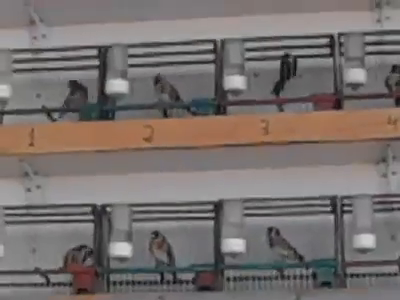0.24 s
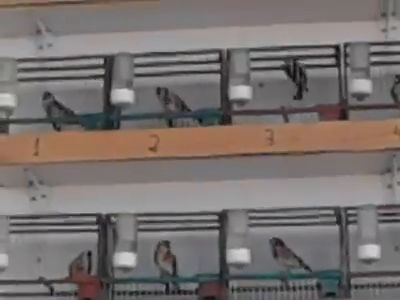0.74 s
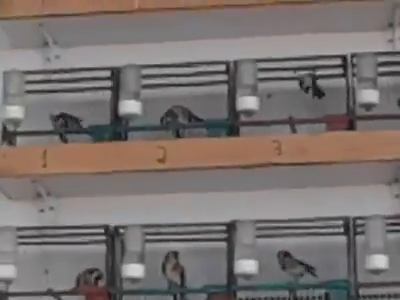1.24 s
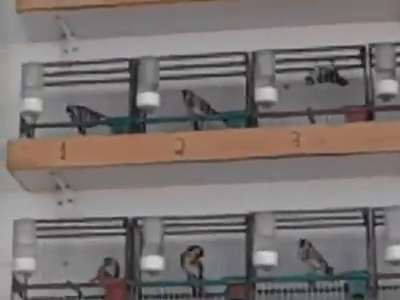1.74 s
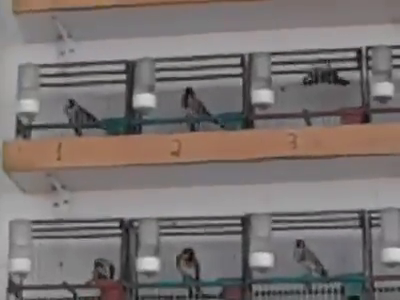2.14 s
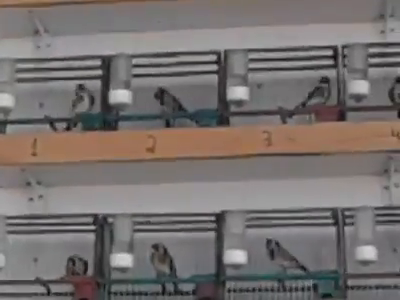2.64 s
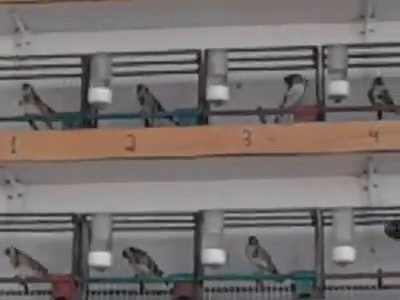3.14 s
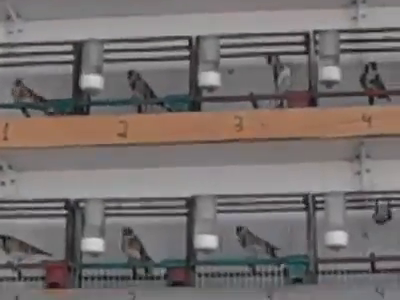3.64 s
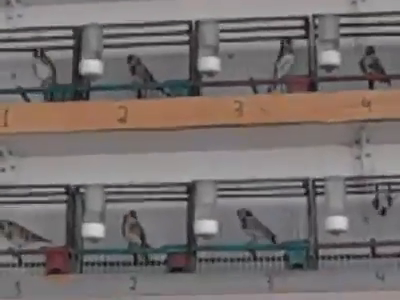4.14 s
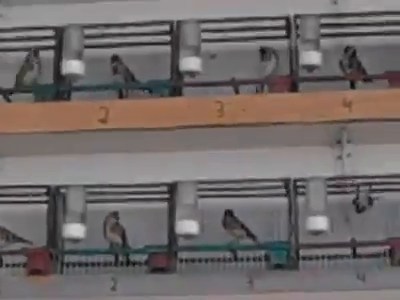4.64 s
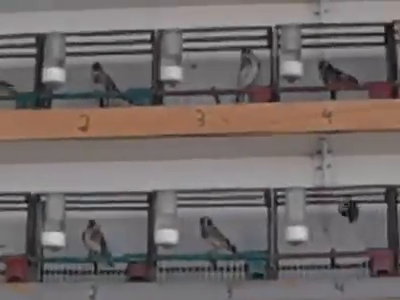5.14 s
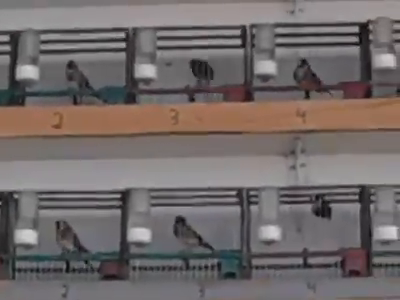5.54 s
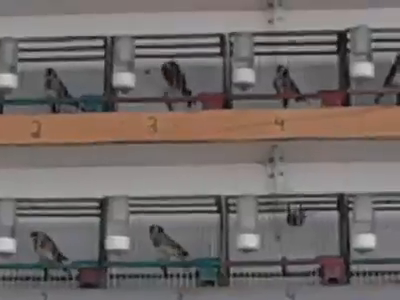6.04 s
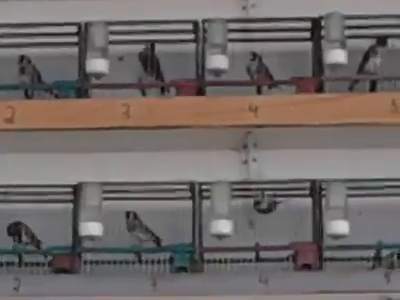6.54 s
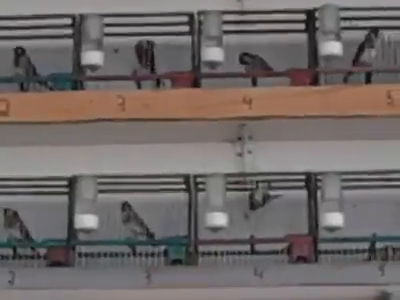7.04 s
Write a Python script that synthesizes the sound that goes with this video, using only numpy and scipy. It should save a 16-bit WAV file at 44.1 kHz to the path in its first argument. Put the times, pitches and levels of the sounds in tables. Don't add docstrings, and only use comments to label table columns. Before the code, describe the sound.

Several small caged finches twitter in bright, rapid chirps and short gliding whistles in a hard-walled room, with brief pauses and faint knocks.

```python
import sys
import numpy as np
from scipy import signal
from scipy.io import wavfile
from scipy.ndimage import uniform_filter1d, minimum_filter1d

SR = 44100
rng = np.random.default_rng(int(sys.argv[2]) if len(sys.argv) > 2 else 0)


def materialize(psi):
    bounded = np.clip(np.atleast_2d(psi).T, -1, 1)
    quanta = np.round(bounded * 32767).astype(np.int16)
    wavfile.write(sys.argv[1], SR, quanta)


def rack_gain(trim_db):
    fader = np.asarray(trim_db, float)
    return 10 ** (fader / 20)


N = 321930


def evened(x):
    return x / np.sqrt(np.mean(x ** 2) + 1e-20)


def read(points, hz):
    f, value = np.transpose(points)
    return np.interp(np.log(hz + 1), np.log(f + 1), value)


def add(mix, s, sound):
    part = mix[max(round(s * SR), 0):][:len(sound)]
    part += sound[:len(part)]


def tent(t, top_s, rise, fall):
    return np.minimum(rise * (t - top_s), fall * (top_s - t))


def resonate(x, hz, width):
    turn = np.exp(2j * np.pi * np.cumsum(hz * np.ones(len(x))) / SR)
    r = np.exp(-np.pi * width / SR)
    smooth = signal.lfilter([(1 - r) ** 2], [1, -2 * r, r * r], x / turn + 1e-18)
    return 2 * (turn * smooth).real


def noise(spectrum, patchy_db):
    hz = np.fft.rfftfreq(1024, 1 / SR)
    a, b, patches = rng.standard_normal((N // 256 + 5, 513, 3)).T
    patches = uniform_filter1d(uniform_filter1d(patches, 12, 0), 12, 1)
    level_db = read(spectrum, hz)[:, None] + patchy_db * evened(patches)
    z = (a + 1j * b) * rack_gain(level_db)
    return evened(signal.istft(z, nperseg=1024, noverlap=768)[1][:N])


# pitch in Hz, level in dB per Hz.
AIR_SPECTRUM = [(25, -18.5), (110, -11), (1320, -15), (3400, -10.5), (6500, -23.5), (8000, -66)]


def still_air():
    return rack_gain(-71.5) * noise(AIR_SPECTRUM, patchy_db=1)


# pitch in Hz, level in dB per Hz.
FLOCK_SPECTRUM = [(1200, -32), (2000, -16), (3500, 14), (6000, 1.5), (7200, -12), (8200, -52),
                  (16000, -85)]
# time in seconds, level in dB.
FLOCK_LEVEL = [(0, -62), (.72, -83.5), (1.1, -56), (1.5, -65), (2.4, -90), (3.5, -70), (3.9, -74),
               (4.6, -65.5), (5.1, -59), (7.3, -55.5)]


def far_flock():
    level_db = np.interp(np.arange(N) / SR, *np.transpose(FLOCK_LEVEL))
    return rack_gain(level_db) * noise(FLOCK_SPECTRUM, patchy_db=4.5)


# peak time in seconds, peak level in dB.
MOTOR_LOADS = [(3.4, -70.5), (4.198, -75), (4.997, -71), (6.248, -82), (6.9, -69.5), (7.3, -83)]


def motor():
    t = np.arange(N) / SR
    idle_db, load_db_per_s, unload_db_per_s = -97, 49, 59.5
    level = rack_gain(idle_db)
    for s, db in MOTOR_LOADS:
        level = level + rack_gain(db + tent(t, s, load_db_per_s, unload_db_per_s))
    return level * evened(resonate(rng.standard_normal(N), 114.7, 31))


# start in seconds, seconds held open, upper band in dB, lower band in dB.
VALVE_OPENINGS = [
    (0.552, 0.81, -47, -66),
    (3.9, 0.4, -77, -70.5),
]


def valve():
    t = np.arange(N) / SR
    open_db_per_s, close_db_per_s = 155, 20
    low_rise_db_per_s, low_lag_s, leak_db = 21, .15, -83.5
    upper, lower = 0, rack_gain(leak_db)
    for s, held, upper_db, lower_db in VALVE_OPENINGS:
        opening = tent(t, s, open_db_per_s, 0)
        closing = tent(t, s + held, 0, close_db_per_s)
        upper = upper + rack_gain(upper_db + np.minimum(opening, closing))
        lower = lower + rack_gain(lower_db + tent(t, s + held + low_lag_s, low_rise_db_per_s, close_db_per_s))
    jet_hz, sag_hz, sag_s = 2503, 137.7, 0.68
    closed_s = sum(VALVE_OPENINGS[0][:2])
    upper_hz = jet_hz - sag_hz * np.clip((t - closed_s) / sag_s + 1, 0, 1)
    upper_hz += 60 * np.exp(-((t - 1.02) / .15) ** 2)
    jet = rng.standard_normal(N)
    hollow = resonate(jet, upper_hz, 115) + 0.4 * resonate(jet, 0.94 * upper_hz, 220)
    high_hiss = upper * evened(resonate(hollow, 2300, 1100))
    return high_hiss + lower * evened(resonate(jet, 1744, 310))


# start in seconds, length in seconds, first and last pitch in Hz, level in dB.
HINGE_WHINES = [
    (0, 0.038, 785, 800, -76.5),
    (0.767, 0.17, 468, 467, -79.5),
    (2.388, .32, 818, 812.5, -68),
    (5.148, 0.16, 815, 819, -73),
    (5.777, 0.083, 1334, 1243, -69.5),
    (6.484, 0.19, 329.8, 329, -74.5),
]


def hinge():
    out = np.zeros(N)
    for s, length, first_hz, last_hz, db in HINGE_WHINES:
        hz = np.linspace(first_hz, last_hz, round(length * SR))
        tone = np.sin(2 * np.pi * np.cumsum(hz) / SR)
        tone += 0.68 * evened(resonate(rng.standard_normal(len(hz)), hz, 36))
        add(out, s, rack_gain(db) * tone * signal.windows.tukey(len(hz), .3))
    return out


# start in seconds, peak in dB, highest pitch in Hz.
PERCH_KNOCKS = [
    (0.344, -62, 830),
    (6.897, -66, 200),
]


def perch():
    out = np.zeros(N)
    t = np.arange(4000) / SR
    for s, db, top_hz in PERCH_KNOCKS:
        band = signal.butter(2, [70, top_hz], "band", fs=SR)
        burst = evened(signal.lfilter(*band, rng.standard_normal(4000)))
        add(out, s, rack_gain(db - 60 * t / 0.096) * burst * np.minimum(t / .003, 1))
    return out


# time in seconds, slips per second in Hz.
LEG_SLIPS = [(2.96, 262.8), (3.16, 257.2), (3.33, 251), (3.45, 258.2), (3.62, 255.3), (3.72, 272)]
# pitch in Hz, width in Hz.
CHAIR_RINGS = [
    (250, 114),
    (520, 306),
    (1060, 390),
]
# time in seconds, level in dB.
RING_CATCHES = [
    (3.2, -58),
    (3.065, -56),
    (3.175, -57),
]
RING_TIRES = [6.5, 13, 13]


def chair():
    times, rates = np.transpose(LEG_SLIPS)
    t = np.arange(times[0], times[-1], 1 / SR)
    slip_hz = np.interp(t, times, rates)
    wobble = 0.29 * uniform_filter1d(rng.standard_normal(len(t)), 400)
    turns = np.cumsum(slip_hz * (1 + wobble)) / SR
    slips = evened(sum(np.cos(2 * np.pi * k * turns) for k in range(1, 7)))
    drive = slips + np.linspace(1.2, 3.5, len(t)) * rng.standard_normal(len(t))
    catch_db_per_s, lift_s, lift_db_per_s = 160, 3.615, 199
    lift_db = np.minimum(lift_db_per_s * (lift_s - t), 0)
    rings = np.zeros(len(t))
    for (catch_s, db), tire, ring in zip(RING_CATCHES, RING_TIRES, CHAIR_RINGS):
        level_db = db + tent(t, catch_s, catch_db_per_s, tire) + lift_db
        rings += rack_gain(level_db) * evened(resonate(drive, *ring))
    return times[0], rings * signal.windows.tukey(len(t), .08)


OVERTONES = [-40, -42]


def note(length, first_hz, last_hz, db, breath):
    t = np.arange(0, 1.15 * length + 0.007, 1 / SR)
    now = breath[:len(t)]
    long_note = np.clip(length / .07 - 1, 0, 1)
    hz = first_hz + (last_hz - first_hz) * (1 - (1 - t / t[-1]) ** 1.2)
    far = np.clip((-46 - db) / 12, 0, 1) * (length > .07)
    drift = .009 * far * breath[np.arange(len(t)) // 8]
    turn = 2 * np.pi * np.cumsum(hz * (1 + drift)) / SR
    hoarse = 5.5 * np.clip(hz / 6890 - 1, 0, 1)
    turn += hoarse * breath[::-1][:len(t)]
    steep = abs(last_hz - first_hz) / length / 300000
    tone = np.sin(turn) * (1 + (0.01 + steep) * now)
    for k, overtone_db in enumerate(OVERTONES, 2):
        shrill_db = (k - 3.5) * 12 * min(length / 0.026, 1)
        if k * min(first_hz, last_hz) < SR / 3:
            tone += rack_gain(overtone_db + shrill_db) * np.sin(k * turn) * (.5 + 0.5 * now)
    rise_s = 0.0032 + 0.34 * min(length, .05) + 0.078 * max(length - .05, 0)
    fall_s = 0.0036 + 0.14 * length + max(length - .07, 0) / 2
    ends = np.clip(np.minimum(t / rise_s, (t[-1] - t) / fall_s), 0, 1)
    tone *= 1 + .85 * long_note * np.sin(2 * np.pi * 23 * t + 2 * breath[0])
    tone *= 1 + 0.5 * long_note * np.sin(2 * np.pi * 9 * t + np.cumsum(now) / 60 + 3 * breath[99])
    swell_db = 3 * np.clip(length / .03 - 1, 0, 1) * (t / t[-1] - .5)
    return rack_gain(db + swell_db) * tone * np.sin(np.pi / 2 * ends) ** 2


# start and length in seconds, lowest and highest pitch in Hz, level in dB.
CROWDS = [(-.05, 0.57, 3516, 5044, -41), (0.448, 0.16, 2536, 8790, -43), (0.808, 0.47, 3590, 5670, -68),
          (2.926, 0.3, 2577, 7500, -43), (3.725, 0.22, 2980, 7380, -56.5), (5.124, 0.24, 2530, 8460, -46),
          (5.754, 0.17, 2595, 6520, -47), (6.195, 0.14, 2770, 6640, -50), (6.806, 0.47, 2810, 7640, -43)]


def chatter(breath):
    out = np.zeros(N)
    for s, length, low_hz, high_hz, db in CROWDS:
        for when, pitch, glide, size in rng.random((60, 4)):
            hz = low_hz * (high_hz / low_hz) ** pitch
            last_hz = np.clip(hz * (.75 + .6 * glide), low_hz, high_hz)
            add(out, s + when * length, note(.007, hz, last_hz, db - 15 * size, breath))
    return out


# seconds from the phrase's beat, length in seconds, first and last pitch in Hz, level in dB.
TWITTER_NOTES = [(-.182, 0.009, 2412, 4275, -45.5), (-.058, 0.017, 5876, 7030, -47),
                 (-.029, 0.018, 3380, 3953, -34.5), (-.04, 0.013, 5150, 5720, -40),
                 (0, 0.0063, 2567, 2767, -36.5), (.021, 0.025, 4150, 4520, -33.5),
                 (.048, .028, 9270, 6100, -44), (.064, 0.0101, 4785, 4090, -36.5),
                 (.08, 0.022, 3680, 2622, -34)]
TUMBLE_NOTES = [(-.21, 0.0136, 2942, 3620, -30.5), (-.143, 0.007, 6350, 6600, -49),
                (-.108, 0.0107, 3290, 3587, -39.5), (-.069, 0.0086, 5960, 6646, -30.5),
                (-.068, 0.0031, 6620, 8600, -71), (-.048, .014, 5450, 4650, -34),
                (-.032, 0.012, 4656, 4155, -30.5), (0, 0.017, 3374, 2912, -36.5)]
THREE_PIPE_NOTES = [
    (0, 0.021, 4914, 5010, -32.5),
    (.04, .067, 3669, 3978, -27.5),
    (.15, .03, 6570, 6330, -29),
]
TWO_PIPE_NOTES = [
    (-.036, 0.019, 6990, 6850, -41.5),
    (0, .028, 6026, 5874, -25),
]
# beat in seconds, level in dB, pitch factor, swell in dB per s.
TWITTER_TIMES = [(.533, -1, 0.98, 1.5), (3.004, -1, 1, -12), (5.215, -2.5, 1, 20)]
TUMBLE_TIMES = [(1.507, -4, 1.006, 2.5), (3.901, -2, 1.001, 5.5), (6.473, -7, .995, -14)]
THREE_PIPE_TIMES = [(2.611, -4.5, 1.005, 20.5), (2.987, -3.2, 0.98, -12), (6.908, -0.5, 1.005, -41)]
TWO_PIPE_TIMES = [(.481, 3, .994, 203.5), (3.988, -7, 1.008, -200)]
STRETCHES = [(1, 1.02, 1), (1.01, .98, 1.01), (.98, 1.05, 1.01), (.9, 1.1)]
# start in seconds, length in seconds, first pitch in Hz, level in dB.
CHIP_NOTES = [(0, 0.008, 4760, -41.5), (0.129, .005, 4780, -40.5), (0.269, 0.009, 3350, -36.5),
              (0.504, .009, 4000, -38.5), (.462, .014, 2630, -49.5), (0.579, .005, 3475, -37),
              (.551, 0.012, 4250, -26.5), (0.583, 0.023, 3350, -44), (1.314, 0.0055, 2867, -33.5),
              (1.701, 0.006, 3464, -39.5), (1.754, 0.012, 6410, -39.5), (2.816, 0.008, 3893, -38),
              (2.843, .008, 3850, -45.5), (2.858, .01, 4190, -43.5), (2.853, 0.018, 4970, -43),
              (2.943, .006, 3230, -37.5), (2.949, .009, 4820, -47), (2.975, 0.0043, 2010, -52.5),
              (2.962, .012, 6820, -46.5), (3.653, 0.017, 3984, -50), (3.786, 0.012, 4020, -47),
              (3.933, 0.01, 4070, -32.5), (4.646, 0.0057, 2895, -41.5), (4.765, 0.0048, 3070, -46.5),
              (5.035, 0.0064, 3095, -41.5), (5.043, 0.013, 3484, -45), (5.105, 0.006, 4840, -38.5),
              (5.336, 0.008, 3410, -32), (5.359, 0.0045, 4860, -31.5), (5.142, .006, 2700, -50),
              (5.171, .009, 3240, -44), (5.2, .008, 4600, -40), (5.16, .014, 6430, -48),
              (5.312, .006, 6050, -44.5), (5.78, .004, 2720, -42), (5.899, .006, 3600, -40.5),
              (7.141, .01, 4860, -41), (1.153, .007, 4270, -48), (3.534, .008, 4270, -48),
              (6.117, .007, 4250, -46), (1.424, .005, 3250, -46), (1.176, .005, 2500, -46),
              (1.69, .003, 3450, -50), (5.537, 0.021, 6415, -37.5), (5.856, .01, 2720, -38),
              (5.971, .009, 2675, -48.5), (5.936, .014, 2610, -45.5), (6.227, 0.016, 5250, -44),
              (6.237, 0.0055, 3600, -36), (7.041, .008, 4200, -43), (7.12, .009, 4095, -29.5),
              (7.163, .013, 5080, -31), (2.592, 0.041, 3390, -52)]
# start in seconds, first and last pitch in Hz, level in dB.
SLUR_NOTES = [(0.092, 3250, 2950, -47.5), (0.092, 6850, 6450, -50), (0.48, 6630, 6300, -41),
              (0.493, 5410, 5240, -34), (.497, 1890, 2270, -48), (1.054, 3030, 3480, -56),
              (1.058, 2480, 2960, -45), (1.172, 2885, 3670, -41.5), (2.569, 6740, 5670, -61.5),
              (2.928, 9050, 6720, -51), (3.555, 2850, 3150, -53), (6.96, 3170, 3750, -37.5),
              (3.817, 3044, 3710, -43.5), (4.548, 2900, 2726, -51.5), (5.192, 2710, 3240, -37),
              (5.224, 2810, 3300, -40.5), (5.446, 2680, 3280, -38.5), (5.286, 6750, 6350, -44.5),
              (.113, 6330, 5950, -51.5), (5.811, 5540, 6250, -41), (5.831, 3170, 3650, -38.5),
              (5.92, 4200, 4800, -41.5), (6.983, 2464, 3050, -37.5), (7.033, 8080, 6980, -44),
              (7.04, 5050, 5690, -30), (7.175, 3110, 3730, -32), (7.197, 6140, 8000, -43.5),
              (.585, 8200, 7250, -62)]
# start in seconds, first and last pitch in Hz, level in dB.
WHIP_NOTES = [(.361, 2200, 3190, -43), (5.349, 3720, 4950, -34), (5.771, 3540, 4350, -36.5),
              (5.91, 3460, 4330, -37.5), (.47, 8830, 6010, -49), (1.869, 2920, 4170, -56),
              (2.172, 7670, 4450, -39.5), (2.461, 2850, 6250, -57), (2.566, 2596, 4310, -55),
              (3.228, 3690, 5750, -40), (3.95, 6640, 8460, -44.5), (5.093, 6320, 4600, -49.5),
              (5.099, 3040, 4330, -39.5), (5.851, 3380, 5030, -32), (6.226, 6400, 3300, -44),
              (6.758, 4240, 5640, -49.5), (6.83, 2390, 4570, -46), (6.914, 5660, 8850, -47.5)]
# start in seconds, length in seconds, pitch in Hz, level in dB.
PIP_NOTES = [(0.19, 0.025, 4050, -44.5), (0.3, .011, 4740, -25.5), (1.758, 0.0056, 5550, -30.5),
             (1.9, 0.0074, 4555, -33.5), (1.943, 0.12, 6305, -71.5), (2.177, .014, 4300, -38),
             (2.724, 0.025, 7680, -44), (4.754, .008, 5780, -58.5), (4.644, .006, 6190, -67.5),
             (3.128, 0.0039, 7520, -42.5), (3.241, 0.006, 3394, -39), (3.752, 0.01, 4480, -50),
             (4.754, 0.011, 6630, -55.5), (5.753, 0.007, 5920, -39), (5.544, 0.0087, 5895, -33.5),
             (5.661, 0.0087, 6027, -29), (5.821, 0.005, 5500, -37), (5.938, 0.023, 5005, -27.5),
             (5.938, .024, 4815, -31), (6.895, .02, 4850, -44), (7.202, .043, 7320, -51)]
# start in seconds, length in seconds, first and last pitch in Hz, level in dB.
WHISTLE_NOTES = [(.139, .011, 2700, 3650, -41), (0.292, 0.018, 5680, 5350, -41),
                 (0.42, 0.038, 6680, 6880, -53.5), (0.342, 0.068, 3389, 3400, -29.5),
                 (0.248, 0.029, 6370, 6700, -64.5), (1.002, 0.095, 4860, 5500, -73),
                 (0.83, 0.3, 4120, 4430, -59.5), (.95, .1, 4650, 4760, -65),
                 (1.92, 0.085, 3078, 3210, -49.5), (2.006, 0.12, 3191, 3293, -46.5),
                 (2.048, 0.091, 6410, 6560, -39), (2.808, 0.11, 3320, 3380, -46.5),
                 (3.247, 0.022, 4200, 5350, -44), (6.03, 0.06, 6610, 6770, -58.5),
                 (6.508, .24, 3050, 3075, -71.5), (6.57, 0.21, 6270, 6280, -74),
                 (.64, 0.19, 5900, 5830, -67.5), (.68, 0.19, 4342, 4290, -64.5),
                 (5.49, 0.13, 3720, 3700, -62.5), (6.29, .14, 3430, 3540, -57.5),
                 (1.043, 0.15, 5300, 5440, -71), (2.155, .022, 5480, 5780, -30.5),
                 (3.262, .3, 3389, 3500, -55), (3.46, .23, 3490, 3540, -56), (3.997, .034, 4550, 3050, -39),
                 (4.87, 0.18, 3675, 3840, -63), (5.659, 0.027, 5170, 4934, -34.5),
                 (6.008, 0.12, 3350, 3407, -43.5), (6.074, 0.036, 6690, 6850, -43.5),
                 (6.147, 0.026, 6150, 6003, -21.5), (6.854, 0.033, 2860, 3600, -46.5),
                 (6.91, 0.044, 6250, 7180, -49.5)]


def songs():
    sung = [(TWITTER_NOTES, TWITTER_TIMES), (TUMBLE_NOTES, TUMBLE_TIMES),
            (THREE_PIPE_NOTES, THREE_PIPE_TIMES), (TWO_PIPE_NOTES, TWO_PIPE_TIMES)]
    rows = []
    for (phrase, times), stretches in zip(sung, STRETCHES):
        for (beat, level_db, pitch, swell), stretch in zip(times, stretches):
            for s, length, a, b, db in phrase:
                note_db = db + level_db + swell * s
                rows.append((beat + stretch * s, stretch * length, pitch * a, pitch * b, note_db))
    rows += [(s, length, hz, 1.09 * hz, db) for s, length, hz, db in CHIP_NOTES]
    slur_hz_per_s, whip_hz_per_s = 44000, 250000
    rows += [(s, abs(b - a) / slur_hz_per_s, a, b, db) for s, a, b, db in SLUR_NOTES]
    rows += [(s, abs(b - a) / whip_hz_per_s, a, b, db) for s, a, b, db in WHIP_NOTES]
    rows += [(s, length, hz, hz, db) for s, length, hz, db in PIP_NOTES]
    return rows + WHISTLE_NOTES


# pitch in Hz, seconds to die by 60 dB.
WALL_RING = [(200, 0.082), (3000, 0.32), (6500, 0.36), (7800, .23), (11000, 0.25)]


def room(cages):
    taps = np.zeros((3, SR))
    at = np.arange(120, SR - 20, 20) + rng.integers(0, 20, (3, (SR - 121) // 20))
    np.put_along_axis(taps, at, rng.choice([-1., 1.], at.shape), 1)
    hz, t, z = signal.stft(taps, SR, nperseg=256)
    dying = rack_gain(-60 * t / read(WALL_RING, hz)[:, None])
    tails = signal.istft(z * dying, SR, nperseg=256)[1]
    return signal.fftconvolve(cages, tails / np.linalg.norm(tails[0]), axes=1)[:, :N].sum(0)


# start in seconds, length in seconds, first
# and last pitch in Hz, level in dB.
FURTHER_NOTES = [(.294, .008, 5050, 4780, -38), (.39, .04, 6600, 6720, -60), (.83, .012, 3750, 4050, -58),
                 (.94, .06, 3600, 3600, -65), (1.172, .008, 5350, 5350, -57), (1.195, .09, 4000, 4000, -64),
                 (1.39, .008, 3900, 4200, -55), (1.699, .012, 3000, 3900, -45), (1.872, .01, 3600, 3950, -51),
                 (2.751, .01, 6430, 6620, -37), (3.137, .01, 6400, 6550, -36), (5.928, .009, 4500, 4850, -40),
                 (5.955, .045, 3300, 3330, -53), (6.845, .006, 4100, 4400, -48),
                 (6.883, .006, 3400, 3700, -47), (6.957, .007, 5500, 6000, -47),
                 (7.054, .01, 6400, 6550, -42)]


def birds():
    breath = evened(resonate(rng.standard_normal(N + SR), 390, 480))
    breath = evened(uniform_filter1d(uniform_filter1d(breath, size=9), size=9))
    cages, direct = np.zeros((3, N)), np.zeros(N)
    for k, (s, *shape, db) in enumerate(sorted(songs()) + FURTHER_NOTES):
        sound = note(*shape, db, breath[round(s * SR):])
        s -= .12 * shape[0]
        add(cages[k % 3], s, rack_gain(-.2 * (db + 37.5)) * sound)
        add(direct, s, np.clip((db + 65.5) / 22, .3, 1) * sound)
    crowd = chatter(breath)
    cages[0] += crowd
    return direct + 0.5 * crowd + rack_gain(-1.5) * room(cages)


# pitch in Hz, gain in dB.
MICROPHONE_PATH = [(1200, -43), (2200, 7), (7000, 7), (8600, -7.5), (9100, -25.5), (9800, -2), (13300, 5),
                   (16000, -37)]


def microphone(x):
    hz = np.fft.rfftfreq(1024, 1 / SR)
    path = signal.firwin2(513, hz, rack_gain(read(MICROPHONE_PATH, hz)), fs=SR)
    return signal.oaconvolve(x, path, "same")


def scene():
    house = still_air() + far_flock() + motor() + valve() + hinge() + perch()
    add(house, *chair())
    return np.array([house + microphone(birds())])


# start in seconds, length in seconds, gain in dB.
GATE_HUSHES = [
    (4.155, .175, -6),
    (1.66, .03, -4),
    (3.63, .025, -4),
]


def gate(x):
    t = np.arange(N) / SR
    highs = signal.sosfiltfilt(signal.butter(3, 2700, "high", fs=SR, output="sos"), x)
    hush_db = 0
    for s, length, db in GATE_HUSHES:
        hush_db = hush_db + db * np.clip(np.minimum(t - s, s + length - t) / .012, 0, 1)
    return x + highs * (rack_gain(hush_db) - 1)


# pitch in Hz, level in dB.
DROP_THRESHOLD = [(5500, -115), (7200, -94), (9000, -100), (15000, -102)]


def thin_out(x):
    hz, _, z = signal.stft(x, SR, nperseg=1536)
    power = (abs(z[:768]) ** 2).reshape(64, 12, -1).mean(1)
    bands_db = 10 * np.log10(np.repeat(power, 12, 0) + 1e-20)
    loudest_db = -minimum_filter1d(-bands_db, size=61, axis=0)
    kept = (bands_db > read(DROP_THRESHOLD, hz[:768])[:, None]) & (bands_db > loudest_db - 36)
    return signal.istft(z * np.vstack([kept, kept[-1]]), SR, nperseg=1536)[1][:N]


# start in seconds, length in seconds, lowest
# and highest pitch in Hz, level in dB.
HIGH_BANDS = [(0.17, 0.042, 7650, 8300, -80), (0.14, 0.094, 11300, 12400, -79.5),
              (0.265, 0.075, 7650, 8800, -76), (0.457, 0.076, 10000, 13900, -66),
              (0.57, 0.089, 10100, 13550, -63.0), (0.825, 0.057, 8500, 8870, -74),
              (1.173, 0.025, 9800, 11400, -82.0), (1.421, 0.039, 7330, 8840, -63.5),
              (1.43, 0.086, 10000, 11300, -85), (1.742, 0.1, 10420, 10900, -71.5),
              (1.955, 0.075, 9400, 10600, -85.5), (2.025, 0.16, 9800, 10700, -65.5),
              (2.146, 0.044, 10700, 11800, -76), (2.18, 0.02, 12500, 14500, -73.5),
              (2.6, 0.13, 10160, 12500, -76.5), (2.926, 0.26, 9800, 13000, -70.5),
              (3.65, 0.17, 8200, 8960, -76.5), (3.819, 0.11, 9700, 11300, -84),
              (3.967, 0.061, 9360, 11400, -63.5), (3.97, 0.1, 11500, 12800, -76.5),
              (5.15, 0.08, 9500, 12000, -73), (5.248, 0.13, 9800, 14500, -67),
              (5.521, 0.096, 11240, 12100, -72), (5.534, 0.076, 13900, 14200, -75),
              (5.65, 0.058, 10170, 11340, -66.5), (5.715, 0.049, 9830, 10860, -59),
              (5.712, 0.12, 11050, 12200, -73.5), (5.897, 0.072, 8300, 9000, -76.5),
              (6.078, 0.073, 9850, 11000, -68), (6.117, 0.13, 11330, 12940, -70.5),
              (6.388, 0.065, 7350, 8800, -78), (6.886, 0.097, 9100, 12000, -78),
              (6.97, 0.14, 10600, 12300, -68.5), (7.022, 0.12, 12300, 13600, -78),
              (7.143, 0.13, 9700, 12100, -70.5), (7.144, 0.06, 8500, 8750, -72.5)]


def high_flicker(x):
    out = np.zeros(N)
    copied_hz, fill_db = 3300, -6
    for s, length, low_hz, high_hz, db in HIGH_BANDS:
        part = x[round(s * SR) - 700:round((s + length) * SR) + 200]
        lifted = part * np.cos(2 * np.pi * (low_hz - copied_hz) * np.arange(len(part)) / SR)
        both = [lifted, rng.standard_normal(len(part))]
        band_pass = signal.butter(4, [low_hz, high_hz], "band", fs=SR, output="sos")
        copy, fill = signal.sosfilt(band_pass, both)[:, 500:]
        band = evened(evened(copy) + rack_gain(fill_db) * evened(fill))
        add(out, s - .004, rack_gain(db) * band * signal.windows.tukey(len(band), 800 / len(band)))
    tick = np.diff(rng.standard_normal(91)) * np.hanning(90)
    add(out, 0, rack_gain(-48) * tick)
    return out


def roll_off(x):
    return signal.sosfilt(signal.butter(12, 15570, fs=SR, output="sos"), x)


def record(dry):
    faint_hiss = rack_gain(-89) * rng.standard_normal(N)
    mix = thin_out(gate(dry[0])) + high_flicker(dry[0]) + faint_hiss
    return roll_off(mix[None])


dry = scene()
out = record(dry)
materialize(out)
```